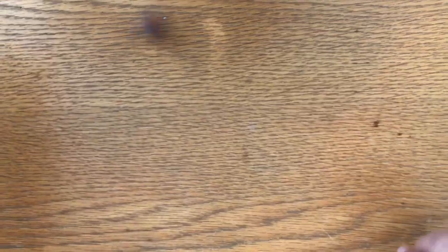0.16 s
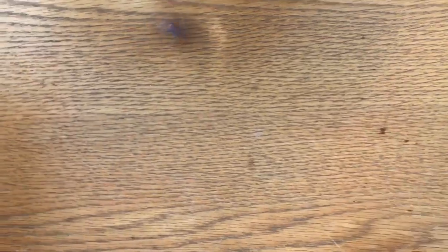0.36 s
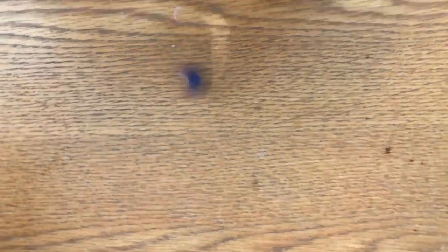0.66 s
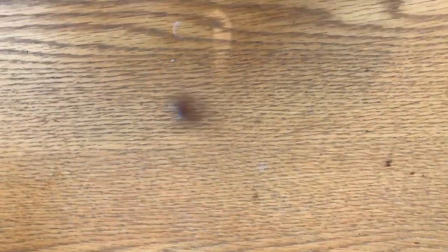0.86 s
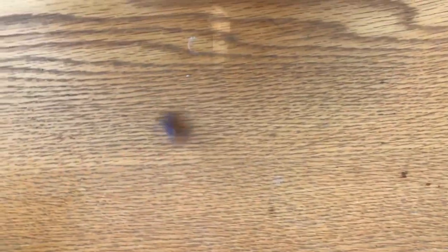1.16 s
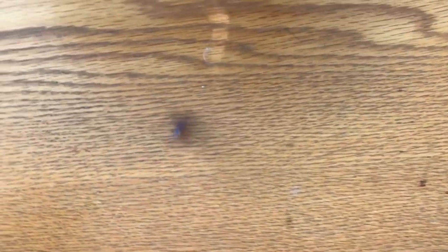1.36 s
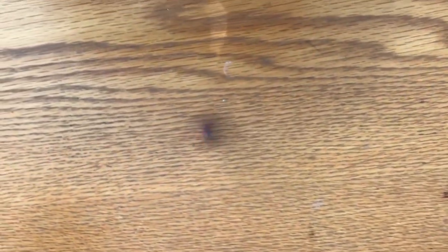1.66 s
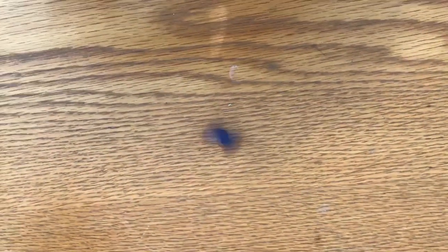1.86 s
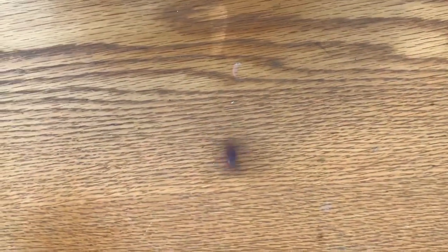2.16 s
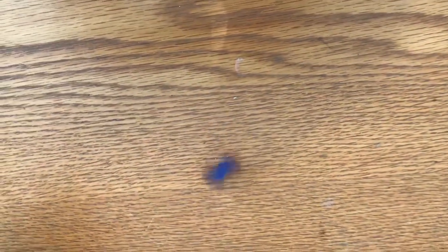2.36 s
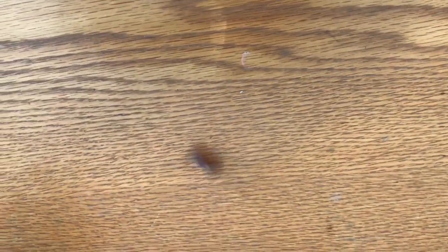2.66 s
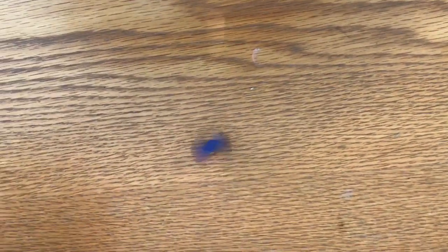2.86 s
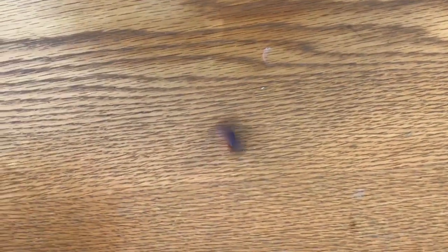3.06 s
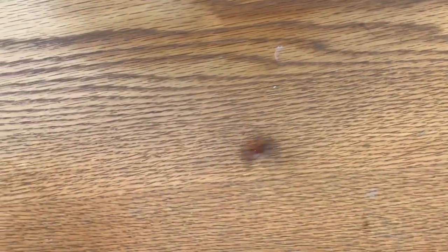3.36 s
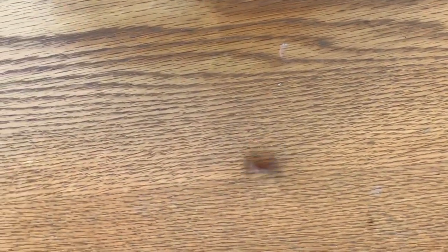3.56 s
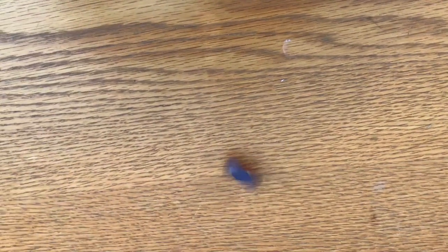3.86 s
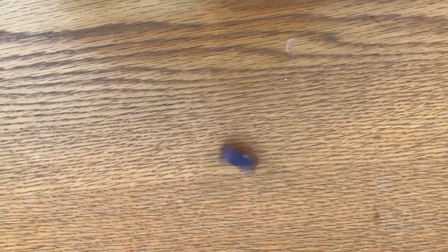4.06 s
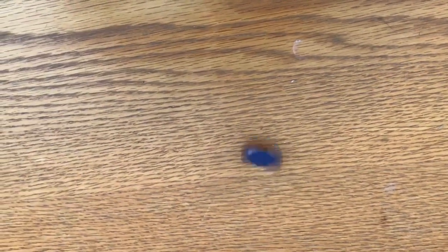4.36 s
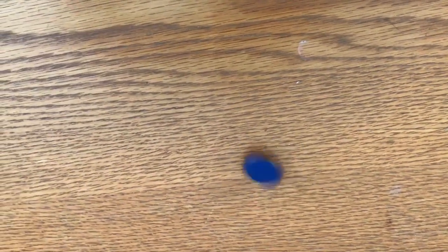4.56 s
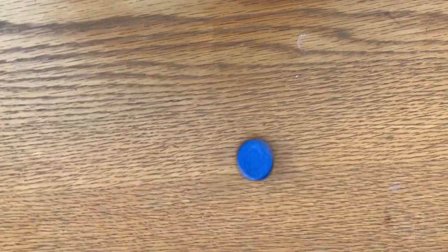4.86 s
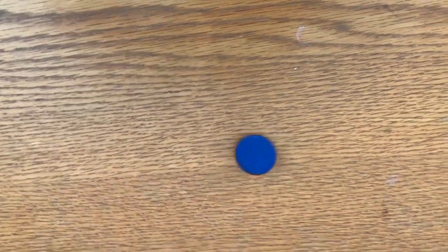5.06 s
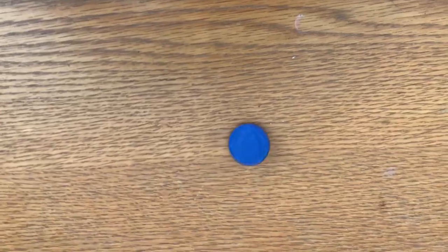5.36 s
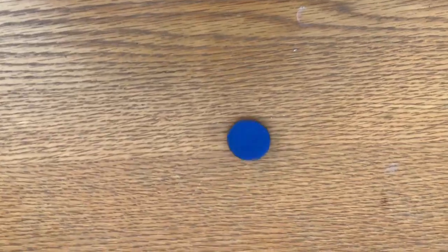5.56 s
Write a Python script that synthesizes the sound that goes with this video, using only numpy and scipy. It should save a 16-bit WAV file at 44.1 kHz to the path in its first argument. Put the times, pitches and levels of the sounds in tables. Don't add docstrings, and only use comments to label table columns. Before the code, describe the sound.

A small metal coin spins on its rim on a wooden tabletop, very close to a phone microphone in a quiet room. Uneven bursts of dry knocks come first, fading to faint ticks, then irregular small clusters. After nearly four seconds it leans over and the clicks crowd together, harder and brighter, into a continuous dense rattle with a thin high ring. It is still rattling at the end.

```python
import sys
import numpy as np
from scipy import signal
from scipy.fft import rfft, irfft
from scipy.io import wavfile
from scipy.ndimage import uniform_filter1d

SR = 44100
rng = np.random.default_rng(int(sys.argv[2]) if len(sys.argv) > 2 else 0)


def magnitude_from_level(level_db):
    exponent = np.asarray(level_db, float) / 20
    return 10 ** exponent


def generate_wav(sig):
    pcm = np.round(np.clip(np.atleast_2d(sig).T, -1, 1) * 32767).astype(np.int16)
    wavfile.write(sys.argv[1], SR, pcm)


N = 251414

# frequency in Hz, level in dB per Hz.
HUSH = [(25, -13), (50, 2), (100, 1), (300, -7), (520, -3.5), (680, 2.5), (950, -17), (2000, -25),
        (2700, -19.5), (4000, -21.5), (8000, -25.5), (10500, -28), (13000, -26), (15800, -30)]
# frequency in Hz, time to fall 60 dB in seconds.
ROOM = [(150, 0.26), (1000, 0.47), (4000, 0.13), (12000, 0.031)]
# time in seconds, level in dB, hardness in dB.
ROLLING = [(0.0, -46, -30), (0.27, -48.5, -19.5), (0.83, -52.5, -13), (1.16, -55.5, -43), (1.52, -77, -4),
           (1.79, -71, -50), (2.2, -60, -41), (2.32, -53.5, -29), (2.59, -64, -44), (2.98, -68, -26),
           (3.41, -71.5, -39), (3.75, -57, -36), (4.11, -53, -13), (4.43, -43, -7.5), (4.68, -41, -1),
           (5.1, -38.5, 0), (5.52, -38.5, 1.5), (5.7, -38.5, 3.5)]
# start in seconds, length in seconds, knock in dB, hardness in dB.
TRAVEL = [(.020, 0.057, -21, -7), (.1187, 0.007, -4.5, -5), (.1275, 0.0063, -15, 1.5),
          (.143, 0.011, -10, -7), (.179, 0.011, -21, -5), (.2245, 0.009, -7, -8), (.2385, 0.031, -7, -7.5),
          (.2749, 0.027, -14.5, -4.5), (.3321, 0.021, -9, -2.5), (.4245, 0.0054, -7, -4),
          (.437, 0.02, -6.5, -3.5), (.4939, 0.0052, -12, -9), (.5403, 0.041, -17.5, -9),
          (.6016, 0.023, -11.5, -3.5), (.656, 0.03, -12.5, -11.5), (.7159, 0.019, -10.5, -6.5),
          (.7698, 0.012, -17.5, -21), (.835, 0.018, -12, -32), (.8945, 0.0067, -13.5, -35),
          (.9034, 0.046, -11.5, -7.5), (.9558, 0.012, -20, -39), (1.0162, 0.013, -16.5, -14),
          (1.0716, 0.016, -21, -37), (1.1359, 0.023, -17.5, -11), (1.1554, 0.012, -26, -8),
          (1.2222, 0.015, -22.5, -33), (1.2711, 0.024, -22.5, -28), (1.3474, 0.0076, -23.5, -16),
          (1.417, 0.011, -46, -36), (1.5814, 0.0095, -27.5, -9), (1.665, 0.026, -35, -39),
          (1.70, 0.011, -39, -40)]
# start and length in seconds, knock and hardness in dB.
STAND = [(1.770, 0.023, -25.5, -36), (1.8523, 0.018, -19.5, -10.5), (1.930, .015, -35, -29),
         (1.9962, 0.023, -11.5, -10.5), (2.068, 0.0067, -16, -13), (2.0813, 0.0066, -12.5, -10),
         (2.1611, 0.0065, -23.5, -8), (2.2015, 0.0082, -22.5, -34), (2.2319, 0.0084, -20, -38),
         (2.300, 0.006, -22.5, -26), (2.307, 0.0032, -12.5, -21), (2.3125, 0.023, -12, -9),
         (2.3911, 0.025, -9.5, -7.5), (2.4734, 0.0071, -13.5, -37), (2.4863, 0.016, -13, -9.5),
         (2.5717, 0.0074, -23, -30), (2.640, .008, -20.5, -30), (2.6555, 0.029, -17, -18),
         (2.7348, 0.0061, -22.5, -13), (2.7532, 0.013, -15.5, -14.5), (2.8376, 0.026, -41, -30),
         (2.9323, 0.011, -27, -22), (3.0306, 0.01, -33, -38), (3.1369, 0.02, -26.5, -40),
         (3.1823, 0.01, -30, -40), (3.2302, 0.0077, -31, -12), (3.319, 0.026, -20, -32),
         (3.413, 0.025, -22.5, -32), (3.520, 0.068, -22.5, -35), (3.6108, 0.021, -22.5, -40),
         (3.636, 0.029, -14.5, -12)]
# start and length in seconds, knock and hardness in dB.
LEAN = [(3.715, 0.015, -27, -35), (3.729, .004, -15.5, -10), (3.7415, 0.011, -10, -7),
        (3.7645, 0.011, -14, -3), (3.8228, .006, -13, -12), (3.841, 0.0096, -11, -4),
        (3.8575, 0.0063, -10.5, -3.5), (3.8685, 0.022, -19.5, -4), (3.9535, 0.0087, -14, -6),
        (3.9663, 0.024, -11, -3), (3.993, .015, -21.5, -1.5), (4.060, 0.055, -13.5, -4),
        (4.1665, 0.013, -12.5, -4.5), (4.178, 0.021, -11, -2.5), (4.2058, 0.011, -5, 0),
        (4.2195, 0.02, -13.5, -1), (4.2818, 0.0087, -19, 0), (4.2932, 0.022, -9.5, 3.5),
        (4.3045, .004, -13.5, 5.5), (4.328, 0.0043, -8.5, -6), (4.3406, 0.0079, -23, 2)]
# the runs, gap in seconds, unevenness 0-1,
# fade in dB over a run, dulling in dB over a run, scatter in dB.
BOUNCE = [(TRAVEL, .0105, 0.38, -6, -6.5, 3.3), (STAND, 0.013, .35, -8, -9, 7.8),
          (LEAN, .0115, 0.21, -2.1, 0, 1.5)]
# time in seconds, knock in dB,
# hardness in dB.
SINGLE_TOUCHES = [(4.4125, -5.5, 3.5), (4.424, -4, 3), (4.44, -4, 1.0), (4.4473, -6.5, 1),
                  (4.4526, -8.5, 5.5), (4.464, -16.5, 0), (4.469, -28, 0), (4.4814, -24, -7),
                  (4.5235, -6.5, 5.5), (4.5321, -3, 0.5), (4.549, -7, 1.5), (4.5587, -8.5, 10),
                  (4.5667, -7, 3.5), (4.5802, -12, 1), (4.589, -25, 0), (4.598, -12, 3),
                  (4.6121, -3.5, -0.5), (4.6268, -3, 1), (4.637, -3.5, 1.5), (4.6432, -9, 3.5),
                  (4.6482, -16, -3), (4.658, -13.5, 9), (4.667, -6, 6), (4.6785, -9.5, 11.5),
                  (4.6885, -11.5, 11.5), (4.7031, -16, -3), (4.711, -22, -0.5), (4.7193, -20, -3),
                  (4.729, -20, 10), (4.7375, -7, 10), (4.7439, -5, 6.5), (4.7544, -5.5, 4), (4.765, -7, 11),
                  (4.779, -5, 6.5), (4.79, -10, 10), (4.7976, -11, 3.0), (4.8122, -14, 13),
                  (4.8269, -8.5, 6.5), (4.837, -14, 12), (4.8548, -9, 7.5), (4.8671, -8.5, 9),
                  (4.875, -14, 4), (4.882, -14.5, 8), (4.887, -11, 14.5), (4.897, -4, 5), (4.905, -13, 1),
                  (4.914, -13, 2), (4.926, -18, 0), (4.937, -13.5, -12), (4.9481, -12.5, 10.5),
                  (4.9571, -10.5, 9), (4.969, -6.5, 10), (4.9754, -4.5, 9), (4.9854, -1.5, 11.5),
                  (4.9951, -5, 12.5), (5.009, -3.5, 7), (5.015, -8, 7), (5.025, -17, 14),
                  (5.0351, -7.5, 0), (5.0442, -13, 11.5), (5.0644, -5.5, 5), (5.0742, -7, 6),
                  (5.084, -4.5, 8), (5.1006, -9.5, 9.5), (5.112, -13, 11), (5.12, -17, 12),
                  (5.126, -22, 13), (5.135, -8, 10), (5.151, -13, 13), (5.1565, -13, 7), (5.167, -12, 13),
                  (5.1791, -12, 8), (5.1929, -7.5, 10), (5.202, -7, 12), (5.2194, -4, 12.5),
                  (5.2373, -5.5, 8.5), (5.247, -14, 10), (5.276, -5, 13), (5.2844, -9.5, 9.5),
                  (5.29, -16.5, 23), (5.2995, -14, 11), (5.3118, -12, 13.5), (5.3275, -26, 5),
                  (5.3332, -22, -1), (5.344, -20, 13.5), (5.3518, -9, 9.5), (5.3666, -16, 11),
                  (5.3748, -13, 13), (5.3938, -19, 19), (5.4016, -12, 13), (5.4078, -11, 7.0),
                  (5.4167, -14, 8), (5.4266, -13, 10), (5.4333, -12.5, 11.5), (5.4451, -5, 9.5),
                  (5.4507, -5.5, 6), (5.458, -9, 16), (5.465, -12, 17), (5.4713, -8.5, 12.5),
                  (5.4841, -15, 15.5), (5.4966, -4.5, 8), (5.5027, -22, 17), (5.513, -4, 8.5),
                  (5.53, -12, 14.5), (5.543, -10, 10), (5.552, -12, 16.5), (5.5661, -12, 18.5),
                  (5.5783, -8, 12), (5.5853, -16, 5.5), (5.5964, -13.5, 13), (5.6051, -7.5, 9.5),
                  (5.6148, -13.5, 20), (5.6313, -11, 17.5), (5.641, -11, 12), (5.6517, -12, 6),
                  (5.665, -20, 14), (5.6826, -7, 6), (5.6878, -6, 12)]
# frequency in Hz, level in dB, 60 dB decay in seconds.
TABLE_MODES = [(155, -4, .15), (207, -3, .12), (365, -5, .08), (446, 1, .1), (520, -7, .08), (640, -9, .08),
               (730, -9, .08), (855, -5, .08), (945, -7, .08), (1145, -4, .07), (1305, 2, .06),
               (1480, -1, .07), (1620, -3, .06), (1840, -4, .06), (2310, -2, .02), (2500, -4, .045),
               (2790, 2, .03), (3000, 1, .028), (3200, -1, .01), (3830, 0, .012), (4130, 1, .012),
               (4450, 3, .012), (4620, -6, .006), (5310, -6, .015), (5750, -14, .012)]
# frequency in Hz, level in dB per Hz.
WOOD_COLOUR = [(50, -14.5), (100, -4.5), (180, 0), (290, 3.5), (420, 2), (660, -3), (1300, 6.5),
               (2000, -6.5), (2450, -1.5), (2640, -2), (2900, -4.5), (3550, -17.5), (4000, -2), (4450, -10),
               (4800, -27), (5300, -24), (6100, -31.5), (6700, -34.5), (8000, -43), (11000, -52)]
# frequency in Hz, 60 dB decay in seconds.
WOOD_DECAY = [(100, .18), (500, .09), (1500, .05), (3000, .018), (6000, .011), (12000, .008)]
BANDS_HZ = [809, 1980, 3323, 4674]
# time in seconds, boom in dB.
SPOT = [(0, -5.5), (.3, 1), (.7, -4), (1.1, -4.5), (1.6, -2), (2.0, -6), (2.5, -9), (2.8, -7), (3.3, -4),
        (3.9, -4.5), (4.5, -1), (5.0, 0), (5.3, -1), (5.7, 0)]
# frequency in Hz, width in Hz, depth 0-1.
DIPS = [(185, 12, 0.44), (410, 19.6, 0.4), (481, 43, 0.72), (556, 20, 0.45), (682, 22, 0.9),
        (757, 11, 0.37), (1071, 13, 0.8), (1130, 11, 0.6), (2090, 52, 0.2), (2580, 100, 0.4)]
# frequency in Hz, level in dB, 60 dB decay in seconds.
COIN_MODES = [(8200, -14, .006), (9370, -13, .006), (13900, 11, .003), (15550, -14, .004)]
# frequency in Hz, level in dB, 60 dB decay in seconds.
LONG_MODE = [(12545, 0, .042)]

HUSH_DB = -64.5
ECHO_S, ECHO_DB = 0.002584, -7
TIP_S, FLAT_S = 2.78, 5.15
TICK_DB, TICK_HARD_DB = -9.5, 2.5
HOP_DB, HOP_HARD_DB = -3, 1.5
GRAZE_S, GRAZE_DB = .0035, -15
FLAT_DRAG_DB = -3
SETTLED = .45
SMALL_TONES_DB = -3
FLAT_BODY_DB = 2.5
UPRIGHT_CLACK_DB, UPRIGHT_SNAP_DB = -.5, 8
SLAP_S, SLAP_DB = [4.8, 5.21], 6.5
BOOM_HZ = 232
RING_SCATTER_DB = 2.5
FREED_S, FREED_DB = [3.2, 5.0], [-24, 4.5]


def unit(x):
    return x / np.linalg.norm(x)


def read(points, hz):
    f, value = np.transpose(points)
    return np.interp(np.log(hz + 1), np.log(f + 1), value)


def over_time(s, values):
    return np.interp(np.arange(N) / SR, s, values)


def hush():
    hz = np.fft.rfftfreq(N, 1 / SR)
    noise = irfft(rfft(rng.standard_normal(N)) * magnitude_from_level(read(HUSH, hz)), N)
    return magnitude_from_level(HUSH_DB) * noise / noise.std()


def lean():
    return over_time([TIP_S, FLAT_S], [0, 1])


def bounces(runs, gap_s, uneven, fade_db, dull_db, scatter_db, count=7):
    start, length, knock_db, hard_db = np.transpose(runs)[:, :, None]
    chance = rng.spawn(1)[0].uniform(-1, 1, (len(runs), 2 * count, 3))
    shift, weak, odd = chance.T.swapaxes(1, 2)
    step = np.arange(2 * count)
    after = step > 0
    tick = step % 2
    late = gap_s * (step / 2 + after * uneven * shift / 2)
    progress = late / length
    ended_db = -20 * np.clip((late - length) / .004, 0, 5)
    knock_db = knock_db + fade_db * progress + scatter_db * after * weak + TICK_DB * tick + ended_db
    hard_db = hard_db + dull_db * progress + 2 * scatter_db * after * odd + TICK_HARD_DB * tick
    return np.array([start + late, knock_db, hard_db]).reshape(3, -1)


def marked_touches():
    runs = [bounces(*rule) for rule in BOUNCE]
    singles = np.transpose(SINGLE_TOUCHES) + [[0], [HOP_DB], [HOP_HARD_DB]]
    s, knock_db, hard_db = np.hstack(runs + [singles])
    at = np.clip(np.round(s * SR).astype(int), 0, N - 1)
    clicks = magnitude_from_level(np.array([knock_db - 3.0, knock_db + hard_db - 7.5])).T
    marked = np.zeros((2, N))
    np.add.at(marked.T, at, clicks * (s < N / SR)[:, None])
    graze = np.roll(marked, -round(GRAZE_S * SR), axis=1)
    return marked + magnitude_from_level(GRAZE_DB) * lean() * graze


def touches():
    marked = marked_touches()
    s, level_db, hard_db = np.transpose(ROLLING)
    level_db = over_time(s, level_db)
    hard_db = over_time(s, hard_db)
    rolling = magnitude_from_level(np.array([level_db, level_db + hard_db]))
    nearby = uniform_filter1d(uniform_filter1d(marked ** 2, size=500, origin=200), size=500)
    drag = magnitude_from_level(-6.5 + FLAT_DRAG_DB * lean()) * np.sqrt(abs(nearby))
    ridges = np.cumsum(330 / SR * rng.gamma(.02, 50, N))
    heights = magnitude_from_level(1.2 * np.minimum(rng.exponential(1, N), 4))
    bumps = heights * (np.diff(np.floor(ridges), prepend=0) > 0)
    bumps = bumps / np.sqrt(np.mean(bumps ** 2))
    return marked + bumps * np.hypot(rolling, drag)


def ring(modes, spread_db=0., sign=1):
    hz, db, t60 = np.transpose(modes)[:, :, None]
    t = np.arange(8192) / SR
    gain = magnitude_from_level(db + spread_db * rng.standard_normal(hz.shape)) * sign ** np.arange(len(hz))[:, None]
    return unit((gain * magnitude_from_level(-60 * t / t60) * np.sin(2 * np.pi * hz * t)).sum(0))


def dying_noise(colour_db, decay, size):
    hz, t, z = signal.stft(rng.standard_normal(size), SR, nperseg=512, noverlap=448)
    t60 = read(decay, hz)[:, None]
    z = z * magnitude_from_level(colour_db(hz)[:, None] - 60 * t / t60) / np.sqrt(t60)
    return unit(signal.istft(z, SR, nperseg=512, noverlap=448)[1][:size])


def swelled(response, rise_s):
    t = np.arange(len(response)) / SR
    return response * np.sin(np.pi / 2 * np.minimum(t / rise_s, 1)) ** 2


def in_room(response, wet_db):
    walls = swelled(dying_noise(np.zeros_like, ROOM, size=SR // 2), .01)
    tail = magnitude_from_level(wet_db) * np.r_[np.zeros(250), walls]
    tail[0] = 1
    tail[int(ECHO_S * SR * rng.uniform(.7, 1.3))] += magnitude_from_level(ECHO_DB)
    return signal.fftconvolve(response, tail)


def coloured(response, colour, smooth_hz):
    hz = np.fft.rfftfreq(len(response), 1 / SR)
    spectrum = rfft(response)
    broad = uniform_filter1d(abs(spectrum) ** 2, size=round(smooth_hz / hz[1]))
    log_gain = np.log(magnitude_from_level(read(colour, hz))) - np.log(broad + 1e-12) / 2
    phase = -signal.hilbert(np.r_[log_gain, log_gain[-2:0:-1]]).imag[:len(hz)]
    return irfft(spectrum * np.exp(log_gain + 1j * phase), len(response))


def wood_knock():
    small_tones = dying_noise(lambda hz: read(WOOD_COLOUR, hz), WOOD_DECAY, size=8192)
    wood = swelled(ring(TABLE_MODES, spread_db=-1.0) + magnitude_from_level(SMALL_TONES_DB) * small_tones, 0.0012)
    wood = in_room(wood, wet_db=-14)[:2 ** 14]
    return coloured(wood, WOOD_COLOUR, smooth_hz=420)


def table(force, count=6):
    soft, edge = force
    hardness = np.clip(edge / (soft + 1e-9), magnitude_from_level(-35), magnitude_from_level(10))
    flat = lean()
    upright = 1 - flat
    slap_db = over_time(SLAP_S, [-SLAP_DB / 2, SLAP_DB / 2])
    scatter = magnitude_from_level(2.97 * rng.standard_normal(N))
    trains = [magnitude_from_level(-3.0) * soft * hardness ** -.12,
              magnitude_from_level(-0.5 + FLAT_BODY_DB * flat) * soft,
              magnitude_from_level(-1.0) * edge * hardness ** -.12,
              magnitude_from_level(-5.5 + UPRIGHT_CLACK_DB * upright) * edge * hardness ** 0.6,
              magnitude_from_level(-9.0 + UPRIGHT_SNAP_DB * upright + slap_db) * edge * hardness ** 0.53 * scatter]
    bass, mid, high, top = BANDS_HZ
    ranges = [(bass, "low"), ([bass, mid], "band"), ([mid, high], "band"), ([high, top], "band"),
              (top, "high")]
    bands = [signal.butter(3, hz, kind, fs=SR, output="sos") for hz, kind in ranges]
    place = (rng.random(N) * count * (1 - SETTLED * flat)).astype(int)
    out = np.zeros(N)
    for k in range(count):
        wood = wood_knock()
        for train, band in zip(trains, bands):
            response = unit(signal.sosfilt(band, wood))
            out += signal.oaconvolve(train * (place == k), response)[:N]
    return out


def at_microphone(x):
    boom = signal.sosfiltfilt(signal.butter(3, BOOM_HZ, "low", fs=SR, output="sos"), x)
    x = x + boom * (magnitude_from_level(over_time(*np.transpose(SPOT))) - 1)
    for hz, width, depth in DIPS:
        x = x - depth * signal.lfilter(*signal.iirpeak(hz, hz / width, SR), x)
    return x


def coin(force):
    soft, edge = force
    hardness = np.minimum(edge / (soft + 1e-9), magnitude_from_level(-2.5))
    scatter = magnitude_from_level(RING_SCATTER_DB * rng.standard_normal(N))
    drive = edge ** 0.78 * hardness ** 0.5 * scatter
    metal = unit(in_room(swelled(ring(COIN_MODES, sign=-1), .0008), wet_db=-14))
    long_tone = swelled(ring(LONG_MODE), .001)
    freed = magnitude_from_level(over_time(FREED_S, FREED_DB))
    return signal.oaconvolve(drive, metal)[:N] + signal.oaconvolve(drive * freed, long_tone)[:N]


def scene():
    force = touches()
    wood = at_microphone(table(force))
    metal = magnitude_from_level(-33.5) * coin(force)
    return (wood + metal + hush())[None]


def top_cut(x):
    return signal.sosfilt(signal.butter(12, 15930, fs=SR, output="sos"), x)


def record(dry):
    mic = signal.sosfilt(signal.butter(2, 45, "high", fs=SR, output="sos"), dry)
    mic = signal.oaconvolve(mic, signal.firwin(511, 15790, fs=SR)[None], "same")
    return top_cut(mic)


dry = scene()
out = record(dry)
generate_wav(out)
```